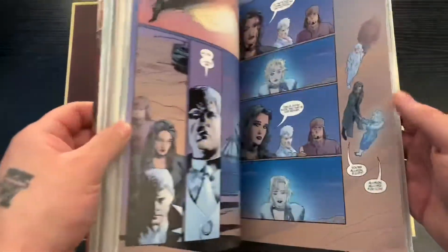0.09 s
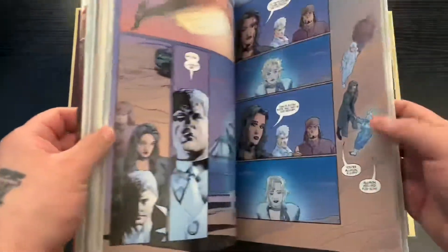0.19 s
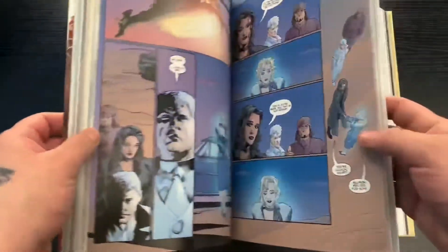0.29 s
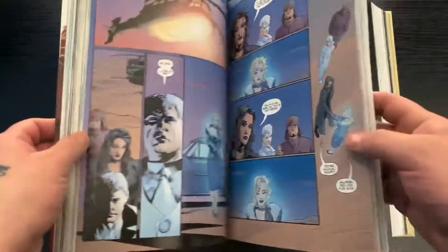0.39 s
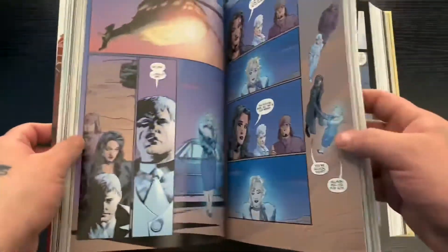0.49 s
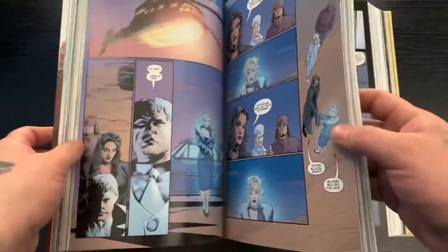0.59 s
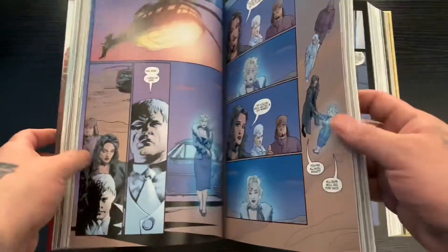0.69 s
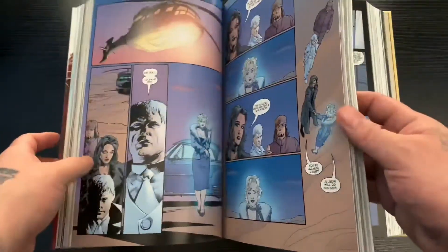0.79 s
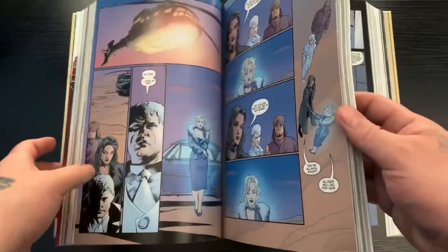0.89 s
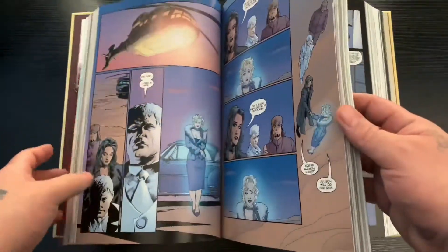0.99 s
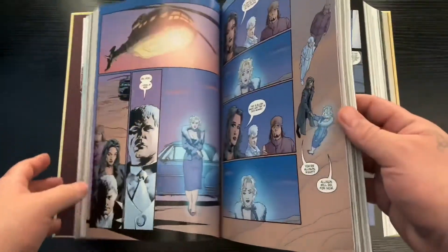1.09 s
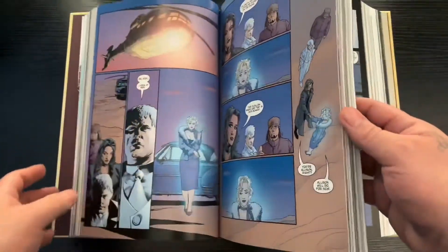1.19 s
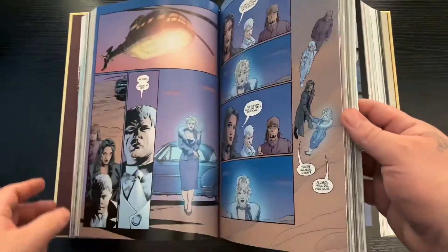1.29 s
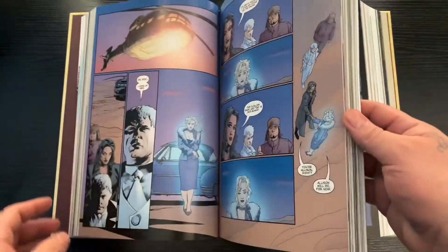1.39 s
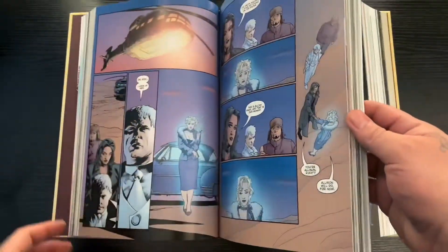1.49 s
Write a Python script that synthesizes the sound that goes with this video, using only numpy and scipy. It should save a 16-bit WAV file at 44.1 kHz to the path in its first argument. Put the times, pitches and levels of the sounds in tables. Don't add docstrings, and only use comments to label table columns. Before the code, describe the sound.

Dull wooden thuds of a thick book settling on a table, followed by faint papery finger rustles

```python
import sys
import numpy as np
from scipy import signal
from scipy.fft import rfft, irfft
from scipy.io import wavfile

SR = 44100
rng = np.random.default_rng(int(sys.argv[2]) if len(sys.argv) > 2 else 0)


def makeup_ratio(level_db):
    decades = np.asarray(level_db, float) / 20
    return 10 ** decades


def dump(signal):
    limited = np.clip(np.atleast_2d(signal).T, -1, 1)
    pcm = np.round(limited * 32767).astype(np.int16)
    wavfile.write(sys.argv[1], SR, pcm)


N = 66150

# start in seconds, level in dB, softness of the contact in ms,
# crack of the slap in dB, extra weight of the low modes in dB per octave.
KNOCKS = [(0.2379, -28.5, 0.11, 2.5, -2.5), (0.2402, -12, 0.32, -0.5, -1.5), (0.2458, -21.5, 0.33, -9, -1),
          (0.2562, -24, 0.23, -11, 1.5), (.2680, -28.5, 0.42, 0.5, 0.5), (0.3629, -27, 0.23, -3.5, 1),
          (0.3105, -16.5, 0.49, 2.5, -3.5), (0.317, -16.5, 0.25, -8, -1.5), (0.3185, -21, 0.47, -12.5, 3),
          (.3390, -25, 0.91, -9, -2), (0.352, -30, 0.39, 8, -3), (0.3548, -16, 0.33, -1.5, -0.5),
          (.3810, -23.5, 0.5, 3, -3), (0.395, -23, 1.18, 0, 2.5), (0.403, -34.5, 0.89, 8, -3),
          (0.415, -38.5, 1.8, -3, 5), (.4320, -27, 1.45, 1, 0.5), (.4610, -42, 1.1, 0, -2),
          (0.485, -34.5, 1.57, -2, -1)]
# start in seconds, length in seconds, level at the start in dB,
# level at the end in dB, brightness in dB per octave.
STROKES = [(0.217, 0.01, -69.5, -64, -7.5), (0.236, 0.055, -56.5, -63.5, -7), (0.299, 0.04, -60, -57, -7.5),
           (0.347, 0.037, -57.5, -63.5, -0.5), (0.39, 0.093, -69, -73.5, -7.5),
           (0.469, 0.13, -63, -60.5, -3), (0.609, 0.18, -71.5, -74, -5), (0.681, 0.019, -61.5, -47, -2.2),
           (0.707, 0.086, -54.5, -64.5, -1), (0.814, 0.077, -72, -67.5, -4.5),
           (0.898, 0.057, -61.5, -52.5, -2.9), (.945, 0.0058, -63, -53, 4), (0.972, 0.05, -62, -61, -4),
           (1.022, 0.02, -50.5, -52, -4.5), (1.025, 0.055, -50.5, -50.5, 5),
           (1.048, 0.049, -45.5, -51.5, 1.5), (1.107, 0.042, -56.5, -53.5, 0.2),
           (1.156, 0.029, -63, -74, -5), (1.272, 0.044, -80, -74.5, 8)]
# frequency in Hz, level in dB per Hz.
PAPER = [(200, 15), (700, 6), (1500, 2), (3000, -5.5), (6500, -5), (10000, -2), (13500, -9.5),
         (16000, -9.5)]
RIGHT_LAG_MS = 0.23


def rms_one(x):
    return x / np.sqrt(np.mean(x ** 2) + 1e-20)


def at_hz(points, hz):
    table_hz, table_db = np.array(points)[:, 0], np.array(points)[:, 1]
    return np.interp(np.log(hz + 1), np.log(table_hz), table_db)


def drift(rate):
    r = np.exp(-80 * np.pi * rate / SR)
    white = rng.standard_normal(N // 40 + 2002)
    slow = signal.lfilter([1], [1, -2 * r, r * r], white)[2000:]
    return np.interp(np.arange(N) / 40, np.arange(len(slow)), rms_one(slow))


def high_pass(x, hz):
    return signal.sosfilt(signal.butter(2, hz, "high", fs=SR, output="sos"), x)


def ring(clicks, hz, t60):
    r = makeup_ratio(-60 / (t60 * SR))
    w = 2 * np.pi * hz / SR
    sine = signal.lfilter([0, np.sin(w)], [1, -2 * r * np.cos(w), r * r], clicks + 1e-18)
    return high_pass(sine, hz / 2)


def ring_twice(clicks, hz, build_s, t60):
    return ring(ring(clicks, hz, build_s), hz, t60) * 2 * np.log(1000) / (build_s * SR)


def bands(spectrum, shape, patchy_db, rate):
    out, power = 0, 0
    edges = 22 * 2 ** np.arange(0, 9.8, 1 / 3)
    white = rng.standard_normal((2, 2, N + SR // 4))
    for k, (low, high) in enumerate(zip(edges, edges[1:])):
        hz = np.sqrt(low * high)
        flicker = drift(rate)
        gain = makeup_ratio(at_hz(spectrum, hz))
        if hz > spectrum[0][0]:
            power += gain ** 2 * (high - low) * 2 / SR
            band = signal.butter(2, [low, high], "band", fs=SR, output="sos")
            noise = signal.sosfilt(band, white[k % 2])[:, -N:]
            out = out + gain * makeup_ratio(patchy_db * flicker) * shape(hz) * noise
    return out / np.sqrt(power)


def pair(two):
    # frequency in Hz, left-right likeness from 0 to 1.
    likeness = [(60, .9), (160, .9), (320, .6), (700, .25), (4000, .35), (6000, .55), (7800, .95),
                (16000, .985)]
    # frequency in Hz, lead of the right side in radians.
    right_lead = [(0, 0), (1500, -2.2), (4000, .3), (6000, -.2), (8200, 2.9), (8900, 3.3), (11100, 6.28),
                  (13100, 9.0), (14000, 9.8), (16000, 12.6)]
    hz = np.fft.rfftfreq(N, 1 / SR)
    a, b = rfft(two)
    alike = np.clip(at_hz(likeness, hz), 0, 1)
    lead = np.interp(hz, *np.transpose(right_lead))
    left = a * np.exp(-.5j * lead)
    right = (alike * a + np.sqrt(1 - alike ** 2) * b) * np.exp(.5j * lead)
    return irfft([left, right], N)


def background():
    # frequency in Hz, level in dB per Hz.
    air_spectrum = [(20, -30), (65, 0.5), (150, -7.5), (320, -9), (750, -24.5), (1200, -14), (1700, -24.5),
                    (2500, -38),
                    (3600, -40), (5500, -46.5), (10000, -39.5), (16000, -49)]
    return makeup_ratio(-59) * bands(air_spectrum, lambda hz: 1, patchy_db=3.5, rate=1.12)


def swells(rows):
    attack_s, release_s = 0.002, 0.007
    t = np.arange(N) / SR
    powers = []
    for s, length, start_db, end_db, _ in rows:
        fade = np.exp(np.minimum(t - s, 0) / attack_s - np.maximum(t - s - length, 0) / release_s)
        level = makeup_ratio(np.interp(t, [s, s + length], [start_db, end_db]))
        powers.append((fade * level) ** 2)
    return np.array(powers)


def stroke_power(hz, broad):
    tilt = np.array(STROKES)[:, 4]
    return makeup_ratio(2 * tilt * np.log2(hz / 6000)) @ broad


def paper():
    # start in seconds, length in seconds, level at the start in dB,
    # level at the end in dB, centre pitch in Hz.
    rubs = [(0.008, 0.054, -62.5, -63, 4050), (0.0043, 0.43, -62, -74.5, 2170),
            (.0, 0.29, -61.5, -71.5, 680), (0.744, 0.2, -62, -77.5, 265), (1.114, 0.063, -60, -60.5, 474),
            (0.393, 0.05, -65, -69, 310), (1.0225, 0.0024, -45, -46, 4600), (1.28, 0.033, -72, -76, 3500),
            (1.12, 0.029, -63, -64, 8500), (.0, .11, -57.5, -58.5, 1140), (0.514, 0.26, -62, -67.5, 1350),
            (0.104, 0.046, -65, -71, 4100), (0.16, 0.066, -83, -63, 4640), (0.49, 0.095, -60, -59, 4260),
            (0.539, 0.064, -70, -60, 6200), (0.737, 0.082, -60, -64, 4200), (0.826, 0.073, -69, -77, 4800),
            (0.901, 0.063, -61, -57.5, 6000), (0.949, .012, -47, -48, 4000), (1.033, 0.071, -48, -52, 3900)]
    rub_octaves, stroke_low_hz = 0.19, 890
    grain_db, grains_per_s = 0, 120
    broad, narrow = swells(STROKES), swells(rubs)
    centre = np.array(rubs)[:, 4]

    def shape(hz):
        strokes = stroke_power(hz, broad) / (1 + (stroke_low_hz / hz) ** 4)
        nearness = np.exp(-(np.log2(hz / centre) / rub_octaves) ** 2)
        return np.sqrt(strokes + 10.0 * nearness @ narrow)

    grain = makeup_ratio(-2.0 + grain_db * drift(grains_per_s))
    return grain * bands(PAPER, shape, patchy_db=2.5, rate=6.8)


def crinkle():
    snaps_per_s, ring_cycles = 2500, 90
    level_db, spread_db = -5.5, 2.5
    broad = swells(STROKES)
    snap_db = spread_db * np.minimum(rng.exponential(1, (2, N)), 4)
    snaps = makeup_ratio(snap_db) * (rng.random((2, N)) < snaps_per_s / SR)
    pitches = np.geomspace(1800, 14500, 24)
    dealt = rng.integers(0, 24, (2, N))
    gains = makeup_ratio(at_hz(PAPER, pitches)) * np.sqrt(pitches)
    out = 0
    for k, (hz, gain) in enumerate(zip(pitches, gains)):
        ringing = rms_one(ring(snaps * (dealt == k), hz, ring_cycles / hz))
        out = out + gain * np.sqrt(stroke_power(hz, broad)) * ringing
    return makeup_ratio(level_db) / np.sqrt(np.sum(gains ** 2)) * out


def contact(s, db, ms):
    t = np.arange(N) / SR - s
    width = max(ms, .05) / 1000
    push = np.where((t > 0) & (t < 2 * width), np.sin(np.pi * t / (2 * width)) ** 2, 0)
    return makeup_ratio(db) * push / (width * SR)


def taps():
    # start in seconds, level in dB, pitch in Hz, time to die by 60 dB in seconds.
    tap_rows = [(.261, -32.5, 389, 0.099), (.260, -32.5, 123, 0.18), (.263, -28, 575, 0.045),
                (0.358, -27, 151.4, .08), (.377, -35.5, 651, 0.13), (.388, -43.5, 149, .1),
                (.402, -34.5, 306.1, 0.197), (.452, -50, 110, 0.14), (.485, -47, 97, 0.14),
                (.52, -52, 64, 0.35), (.555, -49.5, 105, 0.17), (.309, -37, 852, 0.078),
                (1.026, -48, 936, .1), (1.032, -50, 1480, .05), (.695, -48, 1570, 0.08),
                (.240, -42, 1530, 0.049), (.3105, -39.5, 1236, 0.048), (.311, -41, 1560, 0.052),
                (.312, -50, 2060, 0.043), (.3545, -48, 1320, 0.053), (.355, -51, 1900, .05),
                (1.13, -51.5, 388, 0.12), (1.149, -56, 470, 0.049), (.693, -42.5, 683.4, 0.091),
                (.697, -43, 490, 0.08), (.700, -43.5, 644, 0.026), (.838, -53.5, 496, .05),
                (0.945, -48, 1280, 0.074), (.977, -45.5, 490, 0.063), (1.036, -56, 120, 0.1)]
    return sum(ring(contact(s, db, 0.096), hz, t60) for s, db, hz, t60 in tap_rows)


def hollow(push):
    # pitch in Hz, level in dB, build-up in seconds, time to die by 60 dB in seconds,
    # share reaching the right side.
    hollow_body = (542, 6.2, 0.01, 0.02, 0.92)
    hz, db, build_s, t60, share = hollow_body
    half_cycle = int(SR / hz / 2)
    return -makeup_ratio(db) * np.roll(ring_twice(push, hz, build_s, t60), -half_cycle), share


def twist(push):
    # pitch in Hz, level in dB, time to die by 60 dB in seconds.
    twist_modes = [(563, -11.5, 0.11), (561, -19.5, 0.36)]
    build_s = 0.052
    return sum(makeup_ratio(db) * ring_twice(push, hz, build_s, t60) for hz, db, t60 in twist_modes)


def board():
    # pitch in Hz, level in dB, time to die by 60 dB in seconds,
    # share reaching the right side from -1 to 1.
    modes = [(69.58, -25, 0.94, 0.51), (123, -27, 0.37, 1), (151.7, -22, 0.23, 0.78),
             (180.3, -15, 0.068, 1), (309.7, -28.5, 0.39, 0.75), (402.3, -15, 0.12, 1), (490, -15, 0.06, 1),
             (530, -12, 0.071, 0.55), (549.6, -11.5, 0.098, 0.99), (639, -14, 0.15, 0.66),
             (1020, -11.5, 0.0084, 0.39), (1280, -11, 0.031, 0.87)]
    spread_db, weight_below_hz = 2.5, 340
    mode_hz, mode_db, _, right = np.transpose(modes)
    pushes = np.array([contact(*row[:3]) for row in KNOCKS])
    chance_db = spread_db * rng.standard_normal((len(KNOCKS), len(modes)))
    octaves_low = np.maximum(np.log2(weight_below_hz / mode_hz), 0)
    strength = makeup_ratio(chance_db + np.outer(np.array(KNOCKS)[:, 4], octaves_low))
    rings = [ring(strength[:, k] @ pushes, row[0], row[2]) for k, row in enumerate(modes)]
    gain = makeup_ratio(mode_db)
    push, tapping = pushes.sum(axis=0), taps()
    boom, share = hollow(push)
    twisting = twist(push)
    on_right = (gain * right) @ rings + tapping + share * boom
    late = np.interp(np.arange(N) - RIGHT_LAG_MS * SR / 1000, np.arange(N), on_right)
    return np.array([gain @ rings + tapping + boom + twisting, late - twisting])


def hollowed(x):
    # centre in Hz, width in Hz, share removed from 0 to 1.
    valleys = [(776, 160, 0.9), (258, 43, 0.85)]
    for hz, width, share in valleys:
        x = x - np.clip(share, 0, 1) * signal.lfilter(*signal.iirpeak(hz, hz / width, fs=SR), x)
    return x


def slap():
    # frequency in Hz, level in dB per Hz.
    burst_spectrum = [(500, -36.5), (800, 0), (1400, 0), (2200, -12.5), (4000, -27.5), (8000, -38),
                      (12000, -22), (16000, -29)]
    level_db, decay_s, shortening = -31.5, 0.017, 0.54
    s, db, ms, crack_db, _ = np.transpose(KNOCKS)
    kicks = np.zeros(N)
    kicks[(s * SR).astype(int)] = (makeup_ratio(db + crack_db + level_db) / np.maximum(ms, .05)) ** 2

    def shape(hz):
        band_decay_s = decay_s * (1000 / hz) ** shortening
        return np.sqrt(signal.lfilter([1], [1, -np.exp(-2 / (SR * band_decay_s))], kicks + 1e-18))

    return bands(burst_spectrum, shape, patchy_db=1.5, rate=49)


def judder():
    # time in seconds, slips per second, page ring in dB, block thump in dB.
    course = [
        (1.016, 468, -75, -72),
        (1.02, 465, -39.5, -68),
        (1.036, 466, -34.5, -59),
        (1.039, 400, -34.5, -40),
        (1.044, 122, -34.5, -35.5),
        (1.064, 117, -35, -31),
        (1.089, 112, -53, -30),
        (1.097, 100, -43.5, -40.5),
        (1.109, 94, -50, -76),
    ]
    # pitch in Hz, level in dB, time to die by 60 dB in seconds.
    page_modes = [(394.5, -2, 0.081), (461, -8.5, 0.053), (935, -13.5, 0.035), (1441, -10, 0.036)]
    thump_modes = [(124, -5, 0.047), (178, -9.5, 0.15), (227, -8.5, 0.029)]
    jitter, spread_db = 0.025, 1.2
    s, rate, page_db, block_db = np.transpose(course)
    t = np.arange(N) / SR
    turns = np.cumsum(np.interp(t, s, rate) * (1 + jitter * drift(148.9))) / SR
    clicks = np.diff(np.floor(turns), prepend=0)
    slips = signal.lfilter([.2], [1, -.8], clicks * makeup_ratio(spread_db * drift(200)))
    out = 0
    for modes, db in [(page_modes, page_db), (thump_modes, block_db)]:
        driven = slips * makeup_ratio(np.interp(t, s, db, left=-140, right=-140))
        for hz, level_db, t60 in modes:
            out = out + makeup_ratio(level_db) * ring(driven, hz, t60)
    return out


def room(x):
    t60_s, wall_cut_hz = 0.36, 1460
    out = np.zeros((2, N))
    dull = np.exp(-2 * np.pi * wall_cut_hz / SR)
    lags = (rng.uniform(.008, .035, 16) * SR).astype(int)
    for k, lag in enumerate(lags):
        loop, gain, state = x.copy(), makeup_ratio(-60 * lag / SR / t60_s), [0.]
        for i in range(lag, N, lag):
            back, state = signal.lfilter([gain * (1 - dull)], [1, -dull], loop[i - lag:i], zi=state)
            loop[i:i + lag] += back[:N - i]
        out[k % 2] += (loop - x) * (-1) ** (k // 2)
    return out


def scene():
    book, finger = hollowed(board()), judder()
    finger_late = np.roll(finger, int(RIGHT_LAG_MS * SR / 1000))
    finger_pair = np.array([finger * makeup_ratio(-2.0), finger_late * makeup_ratio(-2.5)])
    echo = makeup_ratio(-23.5) * room(high_pass(book[0] + finger, 250))
    noises = pair(paper() + slap() + background() + crinkle())
    return book + finger_pair + echo + noises


def band_limit(x):
    return signal.sosfilt(signal.butter(12, 15970, fs=SR, output="sos"), x)


def record(dry):
    treble_cut = signal.ellip(12, .5, 90, 15700, fs=SR, output="sos")
    mix = high_pass(signal.sosfilt(treble_cut, dry), 17.4)
    return band_limit(mix)


dry = scene()
out = record(dry)
dump(out)
```